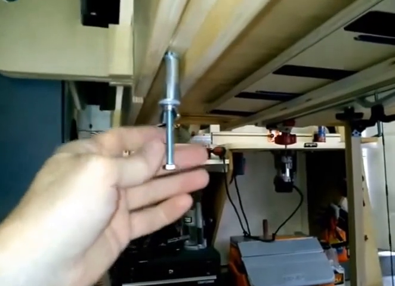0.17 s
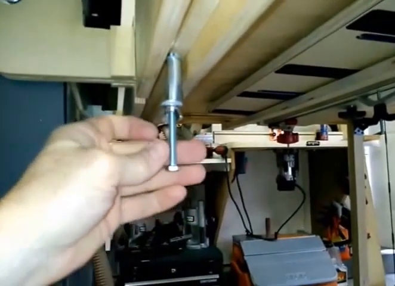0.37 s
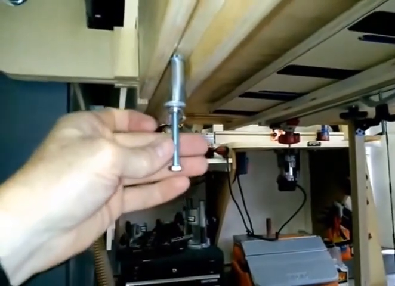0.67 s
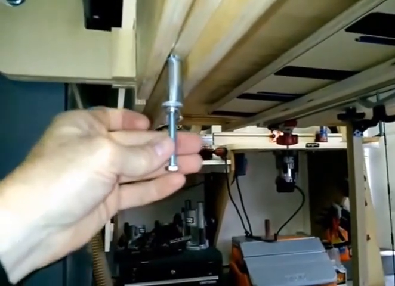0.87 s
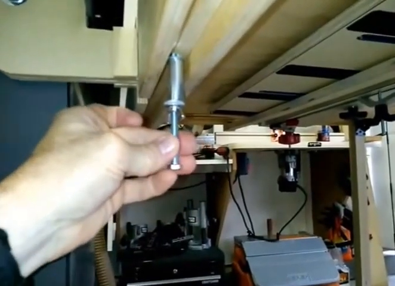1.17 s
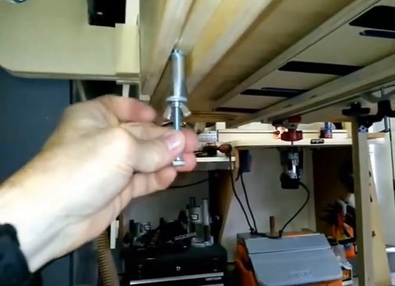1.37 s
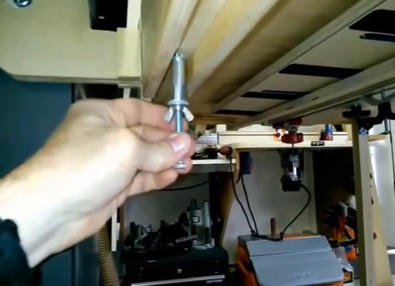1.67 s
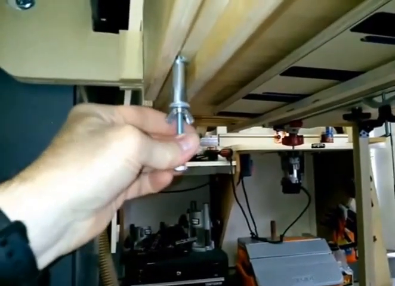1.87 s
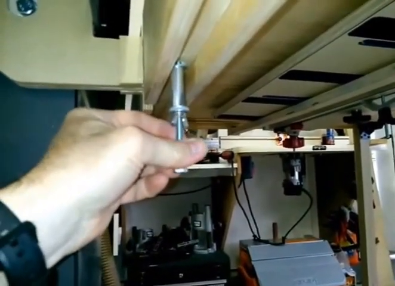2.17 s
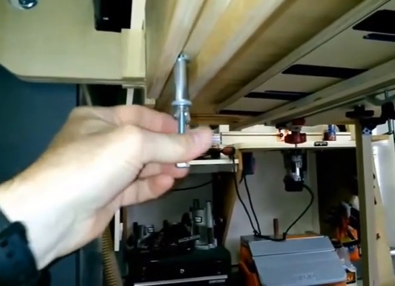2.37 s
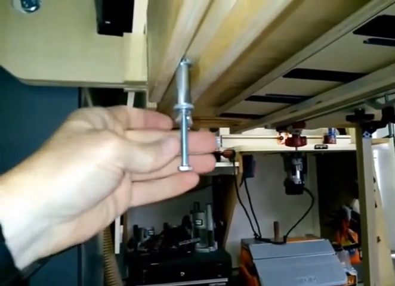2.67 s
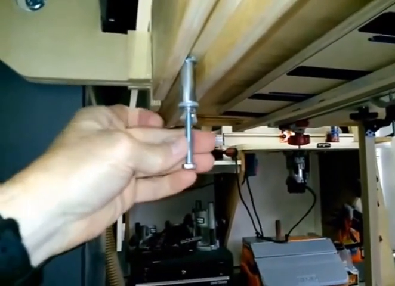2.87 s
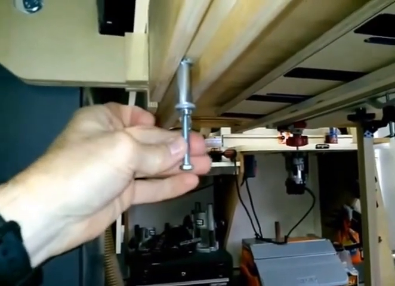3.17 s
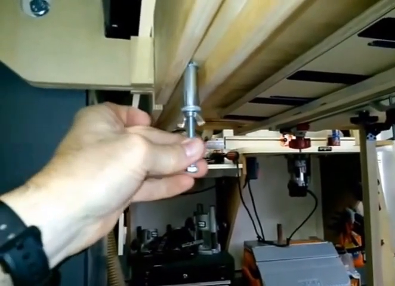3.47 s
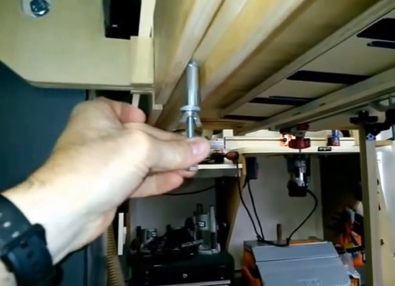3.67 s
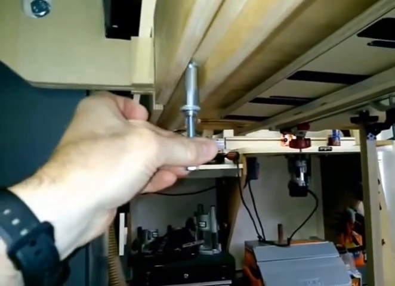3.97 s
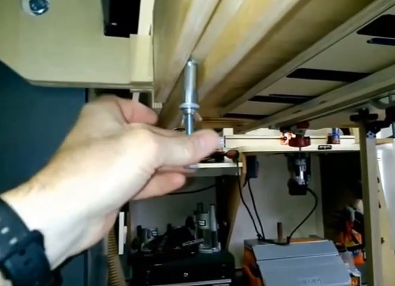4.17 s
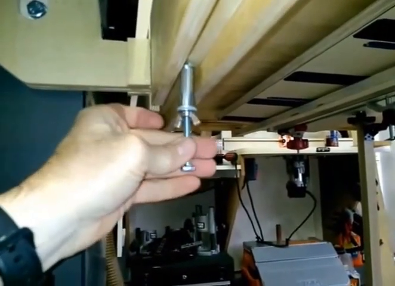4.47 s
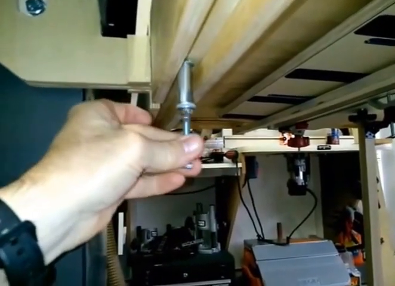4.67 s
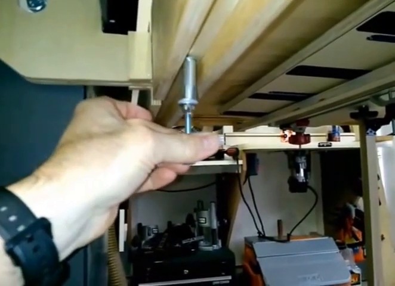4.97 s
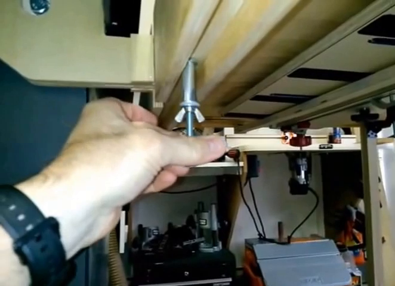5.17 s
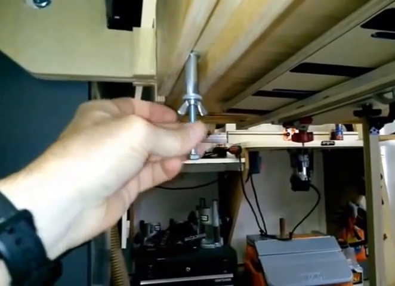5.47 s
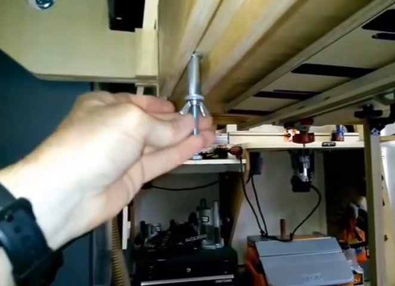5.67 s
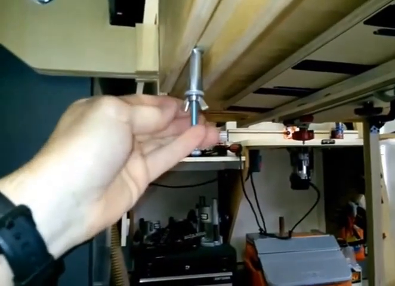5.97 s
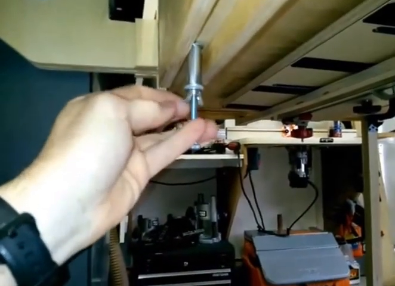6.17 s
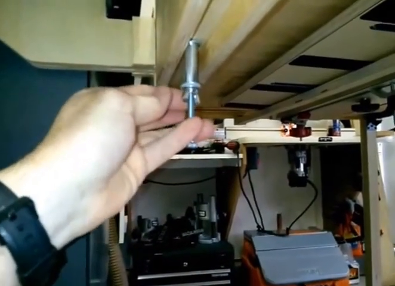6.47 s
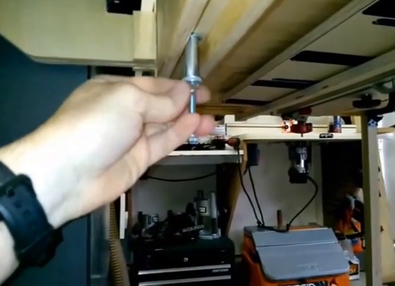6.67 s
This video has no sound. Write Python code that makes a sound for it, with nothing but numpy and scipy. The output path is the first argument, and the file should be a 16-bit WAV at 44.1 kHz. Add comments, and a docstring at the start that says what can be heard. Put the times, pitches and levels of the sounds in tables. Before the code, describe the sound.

A workshop hums low with a fan and mains tone, soft air hiss and a rumble that swells in the first second, then weakens. Close to the microphone, a faint rub starts, and a tiny dry double snap comes at 0.4 s. From 1.45 s fingers spin a wing nut on a steel bolt in wood: gritty scrapes and thread hiss, thickest from 1.7 to 2.2 s, with hollow knocks, bright ticks and a short steel squeak near 2.06 s. Short lighter pushes follow from 2.5 to 3.7 s, with a soft low fingertip bump at 3.35 s. Two sharp clinks stand out at 4.17 and 4.27 s, another dull bump at 4.63 s, then small scrapes and ticks until 5.4 s. Quieter, sparse handling follows, with a knock at 5.86 s, a bright clink at 6.26 s and a last faint rub at 6.76 s. The background dips between movements.

```python
"""A fan and mains hum fill a workshop: wavering sine lines over a low noise rumble and steady air hiss.
Close to the microphone, fingers spin a wing nut up a steel bolt that hangs from a wooden bench top: each
push plays tiny stick-slip clicks through bench and steel resonances, with thread hiss and a faint rattle.
A dry double snap comes early; then the bolt knocks in its hole, the loose nut ticks, dry steel squeaks and
a fingertip bumps the bolt, all as decaying modes, tones or noise. The level sinks between hand movements."""
import sys
import numpy as np
from scipy import signal
from scipy.fft import rfft, irfft
from scipy.io import wavfile
from scipy.ndimage import uniform_filter1d

SR = 44100
rng = np.random.default_rng(int(sys.argv[2]) if len(sys.argv) > 2 else 0)


def waveform_to_disk(signal):
    """Save audio, clipped to [-1, 1], as 16-bit WAV at the path in sys.argv[1]."""
    frames = np.transpose(np.atleast_2d(signal))
    scaled = np.clip(frames, -1, 1) * 32767
    samples = np.round(scaled).astype(np.int16)
    wavfile.write(sys.argv[1], SR, samples)


N = 300321
TIME = np.arange(N) / SR


def undb(db):
    """Decibels to gain."""
    return 10 ** (np.asarray(db) / 20)


def unit(x):
    """Scale to rms 1."""
    return x / np.sqrt(np.mean(x ** 2))


def curve(rows):
    """Gain over time from rows of (s, dB)."""
    return undb(np.interp(TIME, *np.transpose(rows)))


def seconds(length):
    """Time axis of a short sound."""
    return np.arange(int(length * SR)) / SR


def fade(t, t60):
    """Exponential decay that has lost 60 dB after t60 seconds."""
    return np.exp(-np.log(1000) * t / t60)


def add(out, s, x):
    """Mix a short sound in at time s."""
    i = max(int(s * SR), 0)
    out[i:i + len(x)] += x[:N - i]


def emphasis(hz, tilt_db, centre_hz):
    """A harder blow is brighter, and the spot it lands on favours one range of modes (dB)."""
    tilt = tilt_db * np.log2(np.clip(hz, 750, 4000) / 1500)
    octaves_off = np.log2(hz / centre_hz)
    return tilt + 8 * np.exp(-(octaves_off / 0.24) ** 2)


def colour(x, points, tilt_db=0, centre_hz=None):
    """Filter by a (Hz, dB) spectrum, with the emphasis of a blow if one is given."""
    hz = np.maximum(np.fft.rfftfreq(len(x), 1 / SR), 1)
    knots, db = np.transpose(points)
    db = np.interp(np.log(hz), np.log(knots), db)
    if centre_hz:
        db = db + emphasis(hz, tilt_db, centre_hz)
    return irfft(rfft(x) * undb(db), len(x))


def band(x, hz, width):
    """One resonance, gain 1 at its centre."""
    return signal.lfilter(*signal.iirpeak(hz, hz / width, SR), x)


def walk(rate):
    """Smooth random wander around zero, from rate draws a second."""
    k = int(SR / rate)
    steps = np.repeat(rng.standard_normal(N // k + 1), k)
    return 1.5 * uniform_filter1d(steps, k)[:N]


def ring(modes, t):
    """Decaying sine modes from rows of (Hz, t60 s, dB), each starting up or down at random."""
    out = np.zeros(len(t))
    for hz, t60, db in modes:
        sign = rng.choice([-1, 1])
        out += sign * undb(db) * fade(t, t60) * np.sin(2 * np.pi * hz * t)
    return out


def slips(rate, spread_db):
    """Tiny stick-slip clicks of uneven size, about rate of them a second."""
    size = undb(spread_db * np.minimum(rng.exponential(size=N), 3))
    happens = rng.random(N) < rate / SR
    return happens * size * rng.standard_normal(N)


# Fan shaft harmonics, mains hum and a thin whine.
# Each row: pitch in Hz, sine amplitude in dB around which it wavers.
HUM = [(70.5, -64.5), (119.8, -56.5), (143.5, -53), (172.2, -57.5), (200.9, -66.5), (239.8, -62.5),
       (480, -71), (599.6, -63.5), (9628, -72)]
# Low rumble that swells once, then settles. Each row: time in seconds, rms level in dB before chance and dips.
RUMBLE = [(0, -47.5), (.7, -44.5), (1.7, -51), (3, -52), (5.1, -57), (6.8, -57.5)]
# Spectrum of the air hiss. Each row: frequency in Hz, relative level in dB per Hz.
AIR = [(26, -39), (45, -9), (92, -9.5), (150, -9.5), (206, -16), (244, -16.5), (563, -27), (606, -25),
       (685, -28), (1150, -30), (1330, -33), (7950, -36.5), (9440, -38.5), (15800, -38)]
RUMBLE_SWELL_DB = 0.5  # how far the rumble swells by chance
RUMBLE_DIP = 0.18  # the rumble sinks further in a dip, by this share of its dB


def workshop():
    """Fan and mains lines waver in level and phase over a narrow low rumble, steady hiss and a thin noisy whine."""
    hum = np.zeros(N)
    for hz, db in HUM:
        level = undb(db + 0.37 * walk(4.7))
        hum += level * np.sin(2 * np.pi * hz * TIME + 0.28 * walk(3.4))
    rumble = unit(band(band(rng.standard_normal(N), 37, 13), 37, 13))
    rumble = rumble * curve(RUMBLE) * undb(RUMBLE_SWELL_DB * walk(5.6)) * dips() ** RUMBLE_DIP
    air = unit(colour(rng.standard_normal(N), AIR))
    whine = unit(band(rng.standard_normal(N), 9650, 350))
    return hum + rumble + undb(-52) * air + undb(-70.0) * whine


# Each push of a finger turns the nut a little. Each row: moment of full hold in seconds, length in seconds,
# rub on the bench in dB, rub on the steel in dB, thread hiss in dB, pitch of the hiss in Hz.
# The levels are those at full hold, before the dips.
STROKES = [(.02, 0.1, -56.5, -59, -66, 9400), (1.452, 0.026, -55.5, -72, -42.5, 9400),
           (1.51, 0.066, -54.5, -65, -51, 9650), (1.695, 0.027, -43, -63, -37, 9600),
           (1.745, 0.13, -46, -56, -57, 9600), (1.82, 0.11, -44.5, -59, -46.5, 9400),
           (1.99, .1, -44, -49, -45.5, 9100), (2.117, .12, -49.5, -56, -55.5, 9200),
           (2.485, .05, -52, -72, -76, 9350), (2.58, 0.021, -65, -67, -52, 9300),
           (2.812, 0.028, -52.5, -65, -48.5, 9040), (2.824, 0.11, -50, -54, -55.5, 9030),
           (2.997, 0.033, -65, -62, -56.5, 9000), (3.133, 0.02, -48.5, -55.5, -54, 8950),
           (3.175, 0.034, -52.5, -78, -69, 8900), (3.341, 0.064, -51, -57, -52.5, 8700),
           (3.43, 0.092, -53.5, -71, -60, 8700), (3.673, 0.039, -50.5, -57.5, -46, 8770),
           (3.73, 0.11, -55.5, -70, -73, 8800), (3.98, 0.037, -48.5, -60, -56, 9110),
           (4.032, 0.033, -47.5, -64, -62, 9100), (4.105, 0.11, -47, -57.5, -52, 9200),
           (4.23, 0.1, -54, -66, -71, 9100), (4.53, 0.073, -58, -73, -77, 8800),
           (4.615, 0.079, -50, -56, -51, 8760), (4.72, 0.091, -57, -63, -57, 8700),
           (4.822, 0.31, -57, -61.5, -54.5, 8670), (4.935, 0.014, -54, -67, -62, 8650),
           (4.995, .02, -56, -60, -54, 8750), (5.035, .07, -50, -54.5, -51, 8750),
           (5.163, 0.067, -57.5, -67, -61, 8800), (5.385, 0.041, -54, -67, -83, 9200),
           (5.606, 0.032, -62, -64, -66, 9200), (5.875, .09, -47, -58.5, -66, 9100),
           (6.025, 0.029, -68, -72, -53, 9830), (6.211, 0.13, -55.5, -56, -59.5, 9200),
           (6.761, 0.17, -54.5, -55.5, -62.5, 9280)]
PUSH_S, PUSH_SHARE = 0.011, .12  # taking hold: shortest time, and the share of the push length added to it
SAG_DB, LET_GO_S = 8, 0.0092  # easing off along the push; time constant of the release


def pushes(column):
    """Gain over time of all the pushes, each at its own level (dB): attack, sagging hold, release."""
    power = np.zeros(N)
    for (s, length, *_), db in zip(STROKES, column):
        attack = PUSH_S + PUSH_SHARE * length
        t = seconds(length + .25) - attack  # zero at full hold
        take_hold = np.clip(1 + t / attack, 0, 1)
        hold = undb(db - SAG_DB * np.clip(t / length, 0, 1))
        release = np.exp(-np.maximum(t - length, 0) / LET_GO_S)
        add(power, s - attack, (take_hold * hold * release) ** 2)
    return np.sqrt(power)


# Bench top and bolt together, rubbed here and struck in the knocks.
# Each row: pitch in Hz, t60 in seconds (used by the knocks only), relative level in dB.
BENCH_MODES = [(473, 0.1, -3), (603, 0.38, -9), (636, 0.36, -8.5), (719.6, 0.092, 0.5), (758.4, 0.19, -0.5),
               (825, 0.11, -0.5), (1002, 0.2, -4.5), (1140.5, 0.25, -3.5), (1520, 0.14, -15.5),
               (1736, 0.076, 1), (1970, 0.17, -2), (2297, .2, -3), (2400, .13, -11.5), (2940, .14, -14.5),
               (2990, 0.18, -8), (3623, 0.051, -1), (3830, 0.056, -5), (5010, 0.035, 4)]
# Resonances of the rubbed bolt. Each row: pitch in Hz, width in Hz, relative level in dB.
STEEL = [(1724, 250, 5), (1962, 200, 2), (2310, 76, -0.5), (4070, 640, -19)]
# Spectrum of the rub on the bench. Each row: frequency in Hz, relative level in dB per Hz.
RUB_COLOUR = [(210, -44), (350, -6.5), (608, -2.5), (689, -11), (852, -2.5), (930, -12), (1030, -5.5),
              (1440, -7.5), (1720, -34.5), (3600, -29.5), (7000, -5), (9100, -56.5), (15400, -120)]


def rubbing():
    """Slips in the thread ring the bench below and the steel above."""
    _, _, rub_db, steel_db, _, _ = np.transpose(STROKES)
    grit = slips(rate=2200, spread_db=2.5) * undb(2.2 * walk(90))
    wood = sum(undb(db) * band(grit, hz, 25) for hz, _, db in BENCH_MODES)
    steel = unit(sum(undb(db) * band(grit, hz, width) for hz, width, db in STEEL))
    rub = unit(grit) + undb(-3.0) * unit(wood)
    rub = unit(colour(rub, RUB_COLOUR, tilt_db=-1.5, centre_hz=547))
    return rub * pushes(rub_db) + steel * pushes(steel_db)


# Broad resonances of the thread. Each row: pitch in Hz, width in Hz before widening, relative level in dB.
THREAD = [(4240, 500, -16), (7260, 1200, -3), (8060, 890, -0.5), (9670, 590, 3)]
# Nut and bolt, damped by the fingers; they rattle here and ring in the ticks.
# Each row: pitch in Hz, t60 in seconds, relative level in dB.
NUT_MODES = [(3040, 0.017, -17), (4200, 0.024, -17), (5470, 0.0055, -4), (6500, 0.012, -10),
             (6940, 0.0089, 3.5), (8520, 0.01, -5.5), (9120, 0.0088, -0.5)]
RATTLE_PER_S, RATTLE_DB = 45, -12.5  # faint ticks while the nut turns; their level within the thread hiss


def thread_hiss():
    """Finer, denser slips hiss broadly and at a wandering pitch, while the loose nut rattles."""
    s, _, _, _, hiss_db, pitch_hz = np.transpose(STROKES)
    hiss_hz = np.interp(TIME, s, pitch_hz)
    fine = slips(rate=5000, spread_db=1.5) * undb(2 * walk(110))
    broad = np.zeros(N)
    for hz, width, db in THREAD:
        wide = 1.6 * width  # widened, as the resonance is applied twice
        broad += undb(db) * band(band(fine, hz, wide), hz, wide)
    # a resonance that follows the contact: smoothed slips carried up to its pitch
    smooth = signal.sosfilt(signal.butter(2, 320, fs=SR, output="sos"), fine)
    narrow = unit(smooth * np.sin(2 * np.pi * np.cumsum(hiss_hz) / SR))
    taps = slips(rate=RATTLE_PER_S, spread_db=1)
    rattle = unit(signal.fftconvolve(taps, ring(NUT_MODES, seconds(.03)))[:N])
    hiss = undb(-6.5) * unit(broad) + undb(-4) * narrow + undb(RATTLE_DB) * rattle
    return hiss * pushes(hiss_db)


# A small dry double snap. Each row: start in seconds, peak level in dB.
SNAPS = [(0.419, -26.5), (0.4225, -35)]


def snaps():
    """Three modes that die within a few milliseconds make a dry snap."""
    out, t = np.zeros(N), seconds(.08)
    snap = ring([(1270, 0.0032, 0.63), (3070, 0.0023, 0), (5450, 0.0021, 2)], t)
    for s, db in SNAPS:
        add(out, s, undb(db) * snap / np.abs(snap).max())
    return out


# The level dips between movements.
# Each row: low from this time in seconds, length of the low in seconds, depth in dB, time to sink in seconds.
DIPS = [(0.479, 0.0064, -14.5, 0.056), (0.605, 0.015, -16, 0.069), (0.773, 0.0049, -10, 0.024),
        (1.132, 0.0032, -11, 0.016), (1.211, 0.056, -10, 0.023), (1.597, 0.0044, -13, 0.013),
        (2.315, 0.1, -23, 0.023), (2.55, 0.017, -6.5, 0.035), (2.614, 0.028, -11.5, 0.016),
        (2.729, .043, -32.5, 0.097), (2.969, 0.0083, -4.5, 0.022), (3.057, 0.0095, -8.5, .02),
        (3.302, 0.011, -23, 0.079), (3.523, 0.13, -9.5, 0.023), (3.902, 0.051, -18.5, 0.023),
        (4.336, .12, -3, 0.036), (4.498, 0.004, -15, 0.014), (4.723, .08, -2, 0.034),
        (4.972, 0.0049, -6, 0.027), (5.223, 0.0092, -10.5, .025), (5.303, .04, -9, .035),
        (5.373, .15, -3.5, .03), (5.535, 0.034, -14.5, 0.016), (5.68, 0.17, -17, 0.04),
        (5.72, 0.047, -28, 0.037), (5.99, .008, -9, 0.021), (6.088, 0.0046, -12.5, 0.03),
        (6.14, 0.039, -24, 0.019), (6.358, 0.026, -15.5, 0.026), (6.462, 0.026, -15.5, 0.035),
        (6.513, 0.2, -23.5, 0.018)]
RECOVER_S = 0.027  # time to come out of a dip


def dips():
    """Gain that sinks, stays low and recovers at each pause; the deepest dip wins where they overlap."""
    db = np.zeros(N)
    for s, length, depth_db, sink in DIPS:
        corners = [s - sink, s, s + length, s + length + RECOVER_S]
        db = np.minimum(db, np.interp(TIME, corners, [0, depth_db, depth_db, 0]))
    return undb(db)


# The bolt knocks in its hole. Each row: start in seconds, level in dB before the dips,
# decay time constant of the chatter in seconds, tilt in dB per octave, favoured pitch in Hz.
KNOCKS = [(1.456, -39.5, 0.013, -1, 1060), (1.692, -30, 0.019, 2, 730), (1.695, -32.5, 0.023, -1.5, 1940),
          (1.812, -31.5, 0.015, 1, 2890), (1.823, -22, 0.0063, 2.5, 800), (1.832, -28, 0.014, -2, 1130),
          (1.835, -31, .0079, 6, 2330), (1.864, -34, 0.0088, -8, 1146), (2.004, -37, 0.02, -8, 800),
          (2.036, -28, 0.0064, 3.5, 1860), (2.039, -30.5, 0.0056, 4.5, 3650), (2.15, -33, .01, -1, 830),
          (2.47, -39, .006, -1.5, 760), (2.808, -47.5, 0.051, 12, 1950), (3.172, -43, .0092, -11.5, 700),
          (3.676, -39.5, 0.016, -2.5, 990), (3.692, -35.5, 0.016, -7, 820), (4.11, -37, .009, -3.5, 680),
          (4.152, -40, .008, -8, 521), (4.174, -40, 0.012, 3.5, 2900), (4.268, -43.5, 0.0098, 2.5, 1693),
          (4.63, -42, 0.012, 1, 480), (5.863, -36.5, 0.011, -2, 800), (6.263, -42, 0.01, 1.5, 2080)]
# Spectrum of the knock noise. Each row: frequency in Hz, relative level in dB per Hz.
KNOCK_COLOUR = [(180, -42.5), (300, -18), (482, 3), (841, -5.5), (959, -11.5), (1170, -4), (1310, -7.5),
                (2280, -7.5), (3610, -15.5), (4180, -11.5), (7540, -22.5), (9640, -18), (15000, -53)]


def knocks():
    """A decaying noise burst is the blow and its chatter; the wood rings and the room keeps the lows."""
    out, t = np.zeros(N), seconds(.6)
    for s, db, chatter, tilt_db, centre_hz in KNOCKS:
        noises = rng.standard_normal((2, len(t)))
        crack, room = (colour(noise, KNOCK_COLOUR, tilt_db, centre_hz) for noise in noises)
        contact = unit(crack) * np.exp(-t / chatter)
        modes = [(hz, t60, d + emphasis(hz, tilt_db, centre_hz)) for hz, t60, d in BENCH_MODES]
        wood = ring(modes, t) * (1 - np.exp(-t / 0.0014))
        wood = wood / np.linalg.norm(undb(np.transpose(modes)[2]))  # same strength whichever modes are favoured
        room = unit(band(room, 950, 1600)) * fade(t, 0.64) * (1 - np.exp(-t / 0.0079))
        knock = undb(-3.5) * contact + undb(-3.5) * wood + undb(-19.5) * room
        add(out, s, undb(db) * knock)
    return out


# The nut ticks on the thread. Each row: start in seconds, peak level in dB before the scatter,
# pitch in Hz to which the nut modes are scaled, boost of the upper modes in dB.
TICKS = [(1.6925, -42, 6800, 1.5), (1.708, -28, 6700, 7.5), (1.722, -32, 6500, -3.5),
         (1.8213, -23.5, 6660, 2), (1.891, -36, 6470, -13), (1.901, -29.5, 6550, 4.5),
         (1.9687, -25.5, 6800, -6), (1.999, -34, 7450, 14), (2.014, -31, 6660, -2.5),
         (2.036, -29.5, 6780, 0), (2.062, -31, 6800, -3.5), (2.082, -35, 6440, 7), (2.234, -40.5, 6900, 0),
         (2.7876, -50, 6950, 5), (2.797, -41, 6900, 2), (2.809, -35, 6930, -6), (2.892, -37, 6700, -14),
         (3.132, -39, 6970, 1), (4.172, -17, 6840, 3), (4.267, -22.5, 6750, -2.5), (4.598, -43, 6560, -7),
         (4.63, -37, 6640, -9), (4.682, -43, 6600, -5), (4.783, -45, 6750, -4), (4.9868, -43, 6560, 5),
         (5.025, -28.5, 6590, 0), (5.0877, -32.5, 6620, 5), (5.276, -44.5, 6560, -2),
         (5.8592, -37.5, 6860, 7), (5.913, -38, 6850, -13), (6.185, -43.5, 6900, 8),
         (6.2622, -19, 7000, -1.5), (6.281, -29.5, 7160, -5)]
NUT_HZ, LOWER_HZ, UPPER_HZ = 6890, 5000, 7800  # unscaled pitch; low modes lie below, upper modes above


def ticks():
    """Steel meets steel and bounces once: a few milliseconds of ring, then a faint scatter from bench and room."""
    out, t = np.zeros(N), seconds(0.18)
    for s, db, hz, upper_db in TICKS:
        soft_db = -.4 * (db + 24.5)  # a gentle touch favours the low modes
        modes = []
        for f, t60, d in NUT_MODES:
            level_db = d + upper_db * (f > UPPER_HZ) + soft_db * (f < LOWER_HZ)
            modes.append((f * hz / NUT_HZ, t60, level_db))
        tick = ring(modes, t) * (1 - np.exp(-t / 0.0001))
        lag = int(SR * rng.uniform(0.00097, 0.0025))
        bounce = np.pad(tick, (lag, 0))[:len(t)]
        tick = tick + undb(-7.5) * bounce
        tail = rng.standard_normal(len(t)) * fade(t, 0.22)
        scatter = unit(signal.fftconvolve(tick, tail)[:len(t)])
        add(out, s, undb(db) * (tick / np.abs(tick).max() + undb(-44) * scatter))
    return out


# Dry steel squeaks. Each row: middle in seconds, length in seconds, pitch in Hz, level in dB before the dips.
SQUEAKS = [(2.057, .014, 2396, -43), (2.063, 0.021, 2310, -29), (2.079, 0.055, 2275, -40),
           (2.263, 0.03, 4460, -61), (4.622, 0.043, 4110, -56)]
# The bolt rings on. Each row: pitch in Hz, t60 in seconds, relative level in dB.
SQUEAK_MODES = [(2283, .8, -9), (2380, 0.3, -5), (4540, .2, -18.5)]


def squeaks():
    """The thread grabs at a pitch of the bolt, a swelling tone and its octave; the bolt rings on afterwards."""
    out = np.zeros(N)
    for s, length, hz, db in SQUEAKS:
        t = seconds(length)
        phase = 2 * np.pi * hz * t
        tone = np.sin(phase) + undb(-12) * np.sin(2 * phase)
        add(out, s - length / 2, undb(db) * np.hanning(len(t)) * tone)
    ringing = signal.fftconvolve(out, ring(SQUEAK_MODES, seconds(0.71)))[:N]
    return out + undb(-54.5) * ringing


# A fingertip bumps the bolt. Each row: start in seconds, level in dB before the decay, pitch in Hz.
BUMPS = [(3.354, -29, 300), (4.635, -33, 215)]


def fingertip_bumps():
    """A soft fingertip gives one low sine that dies at once."""
    out, t = np.zeros(N), seconds(.08)
    for s, db, hz in BUMPS:
        add(out, s, undb(db) * np.sin(2 * np.pi * hz * t) * fade(t, 0.029))
    return out


def scene():
    """Everything at the bench, one channel; ticks, snaps and bumps stay clear of the dips."""
    dipping = workshop() + rubbing() + thread_hiss() + knocks() + squeaks()
    return (dipping * dips() + snaps() + ticks() + fingertip_bumps())[None]


def record(dry):
    """The recorder cuts the top, steeply above 15850 Hz."""
    return signal.sosfilt(signal.ellip(10, .1, 70, 15850, fs=SR, output="sos"), dry)


dry = scene()
out = record(dry)
waveform_to_disk(out)
```